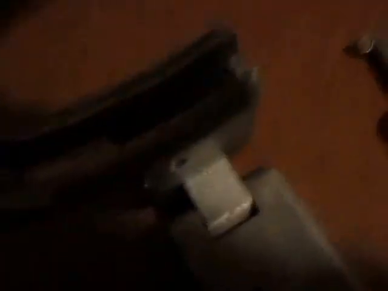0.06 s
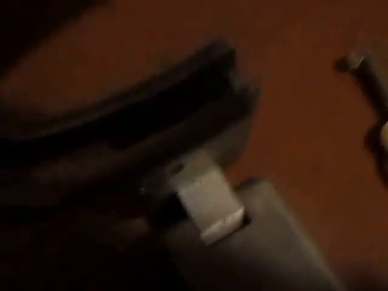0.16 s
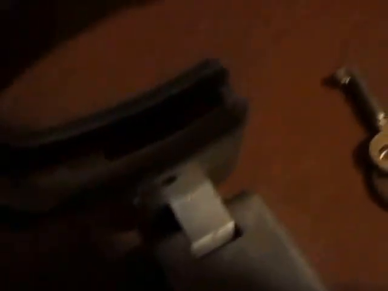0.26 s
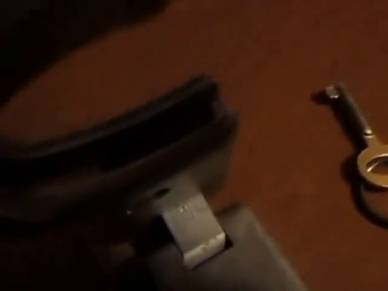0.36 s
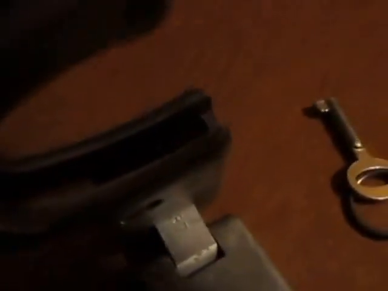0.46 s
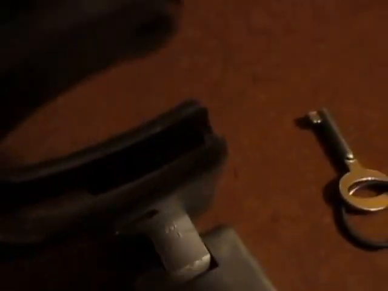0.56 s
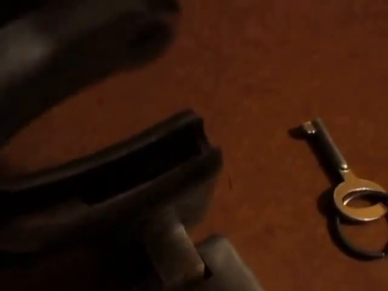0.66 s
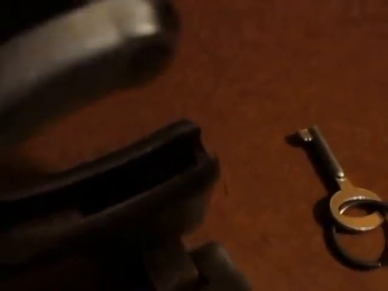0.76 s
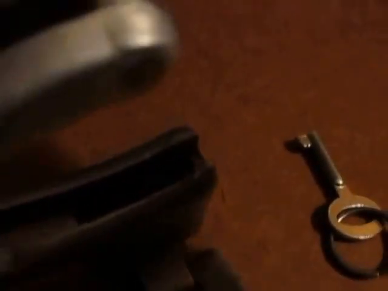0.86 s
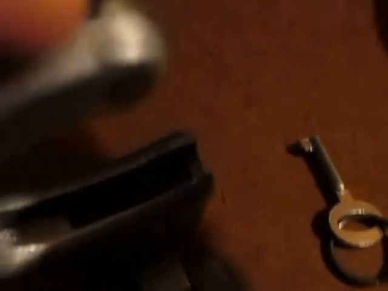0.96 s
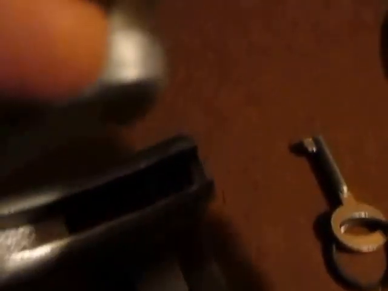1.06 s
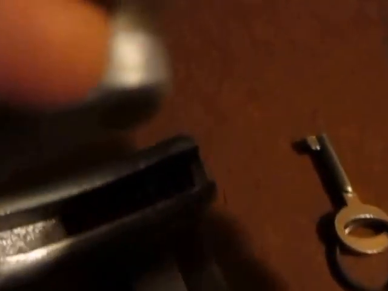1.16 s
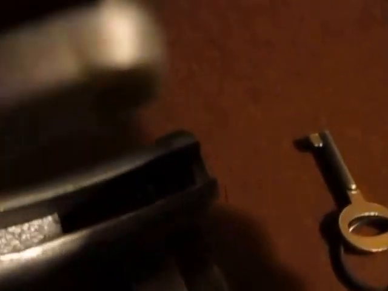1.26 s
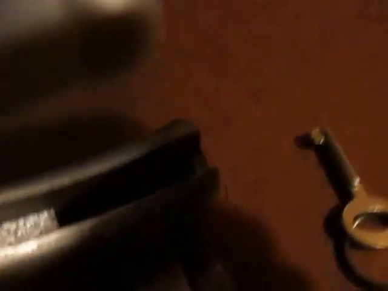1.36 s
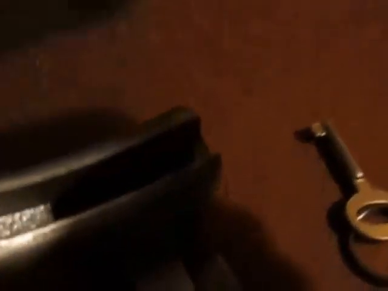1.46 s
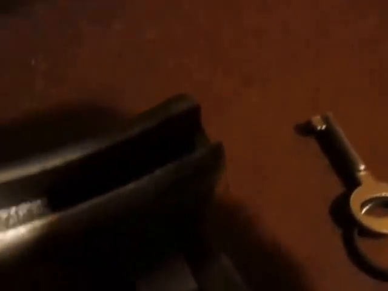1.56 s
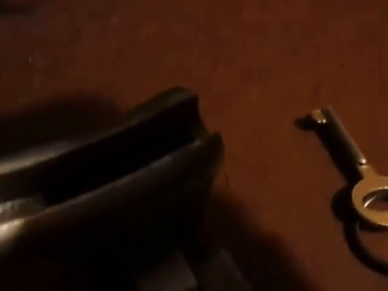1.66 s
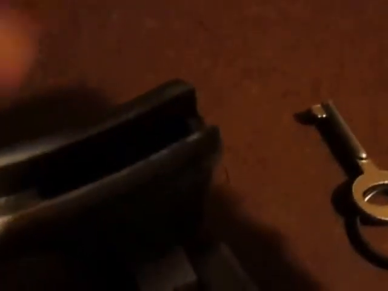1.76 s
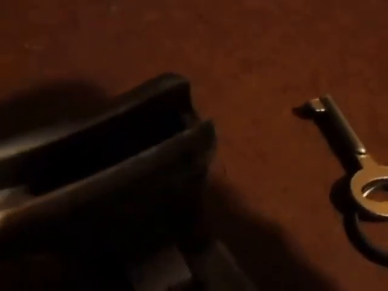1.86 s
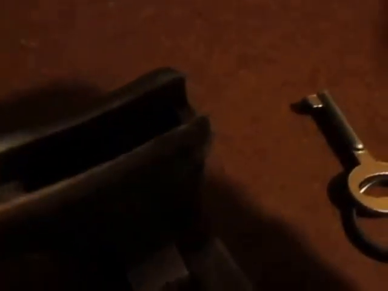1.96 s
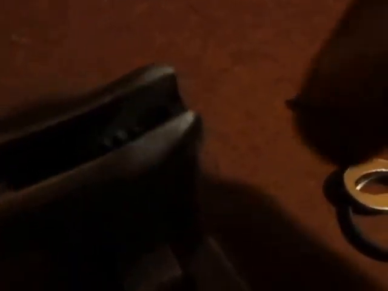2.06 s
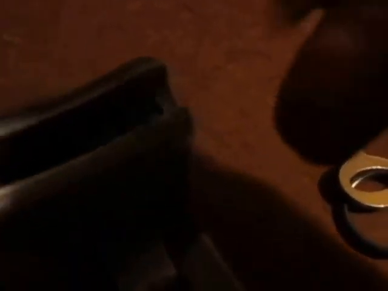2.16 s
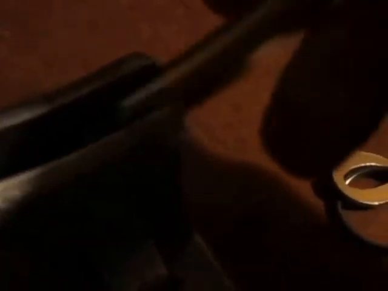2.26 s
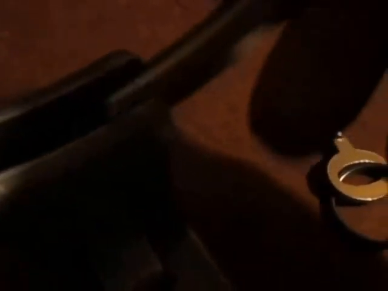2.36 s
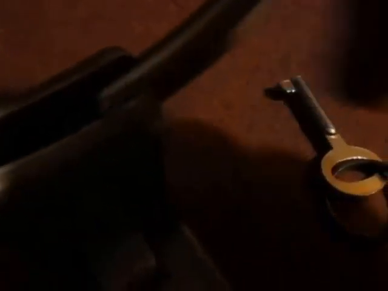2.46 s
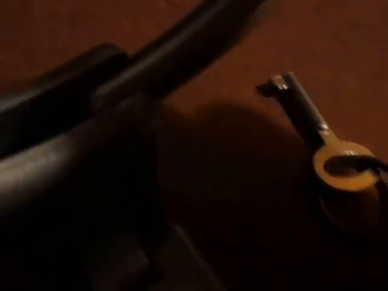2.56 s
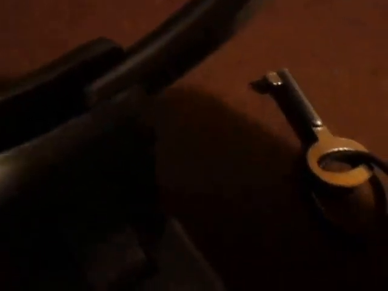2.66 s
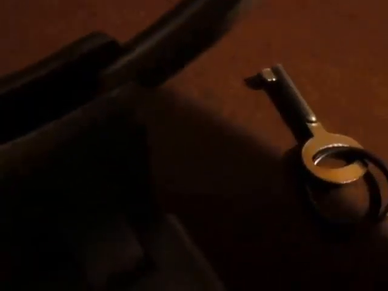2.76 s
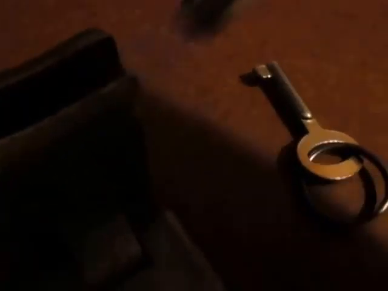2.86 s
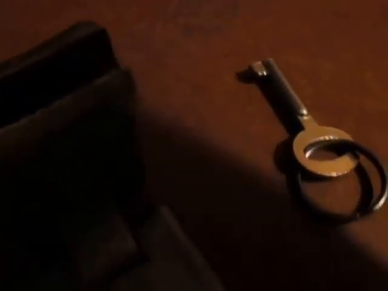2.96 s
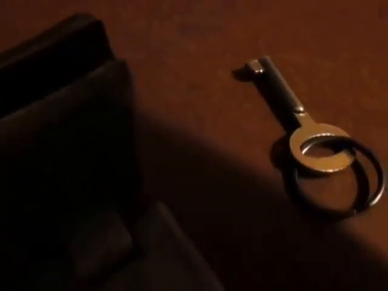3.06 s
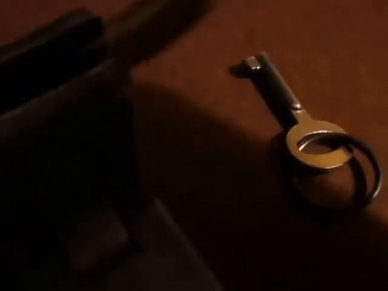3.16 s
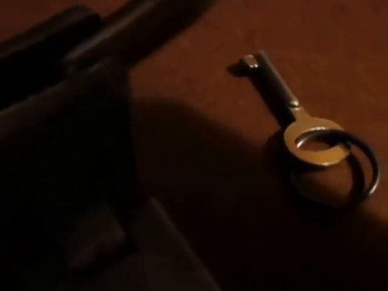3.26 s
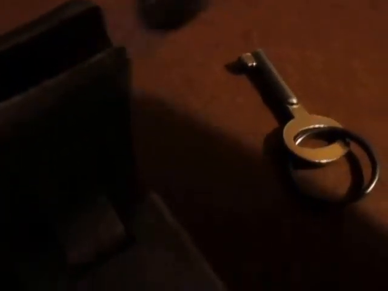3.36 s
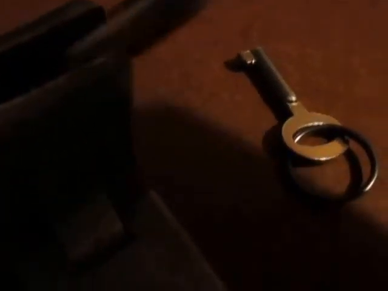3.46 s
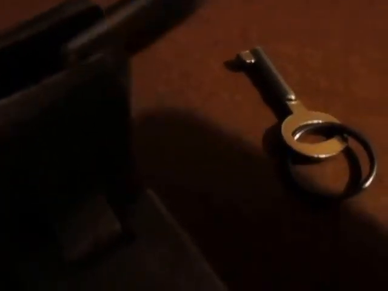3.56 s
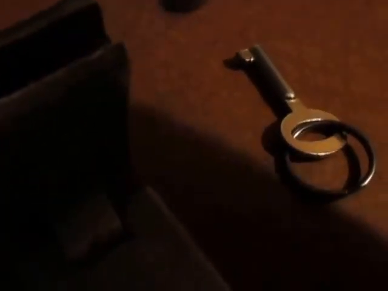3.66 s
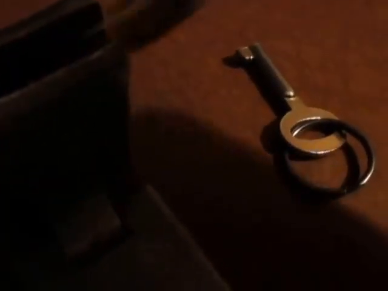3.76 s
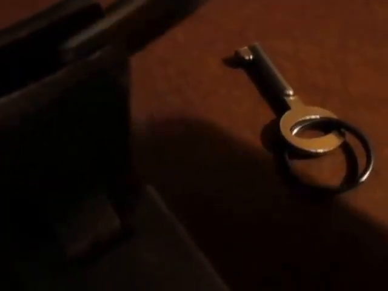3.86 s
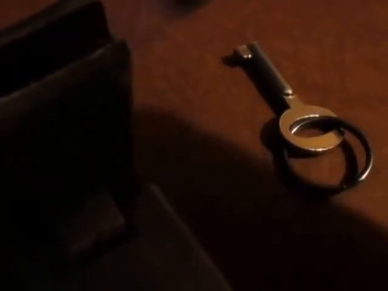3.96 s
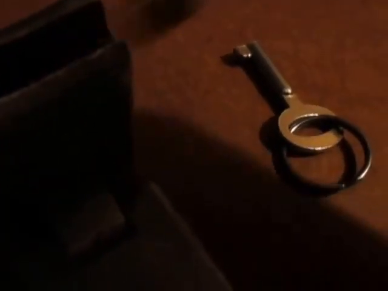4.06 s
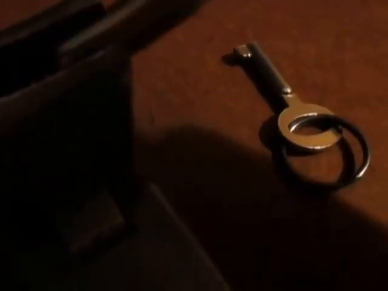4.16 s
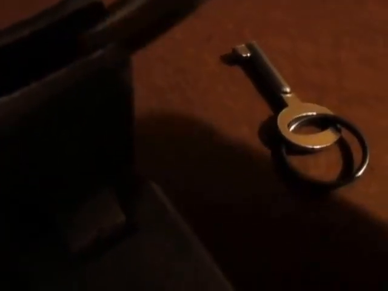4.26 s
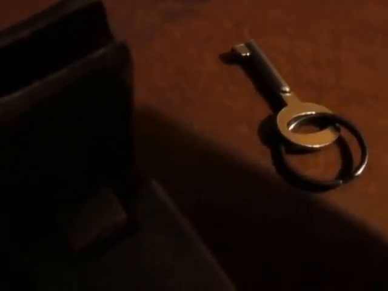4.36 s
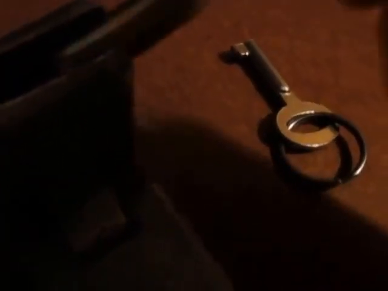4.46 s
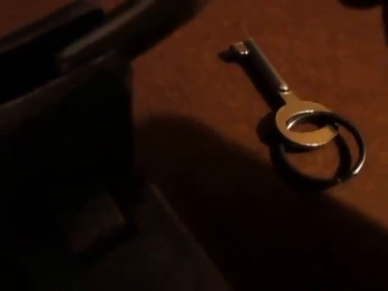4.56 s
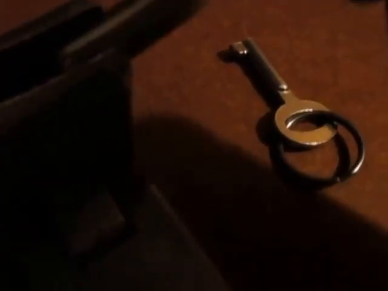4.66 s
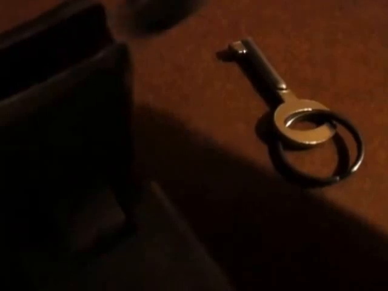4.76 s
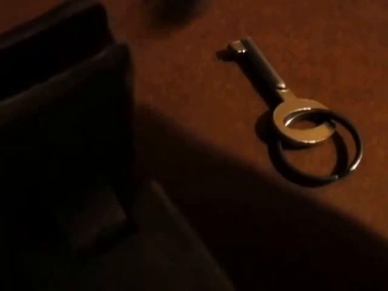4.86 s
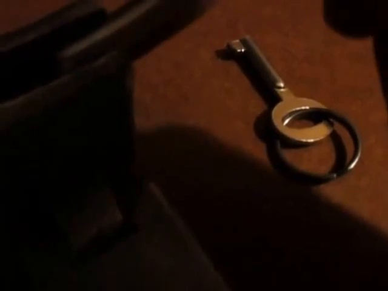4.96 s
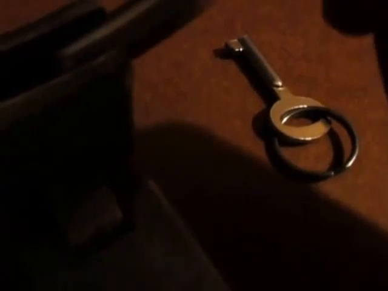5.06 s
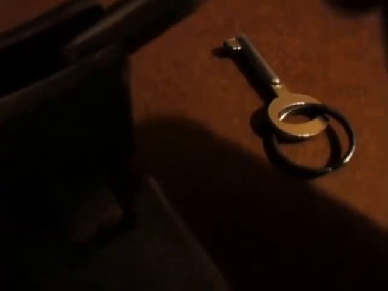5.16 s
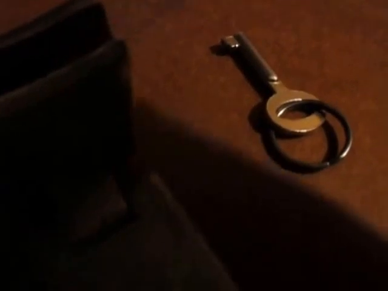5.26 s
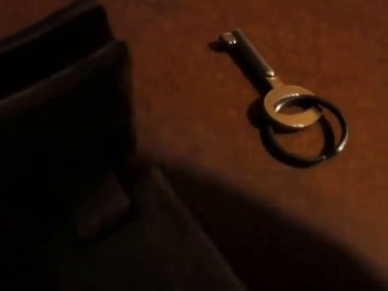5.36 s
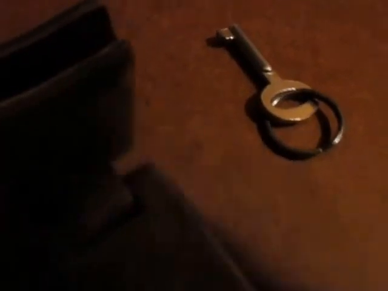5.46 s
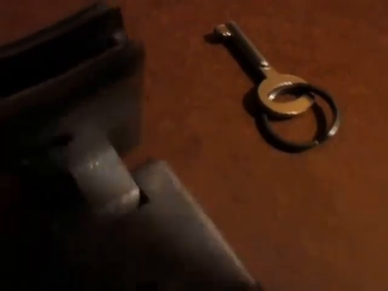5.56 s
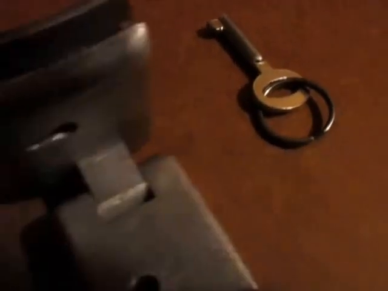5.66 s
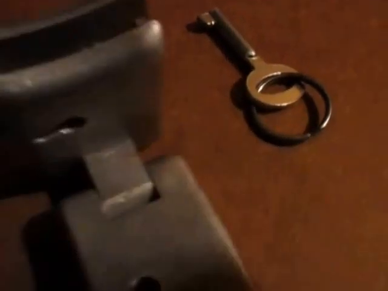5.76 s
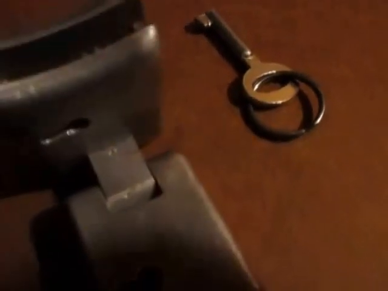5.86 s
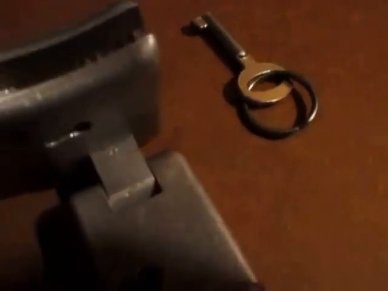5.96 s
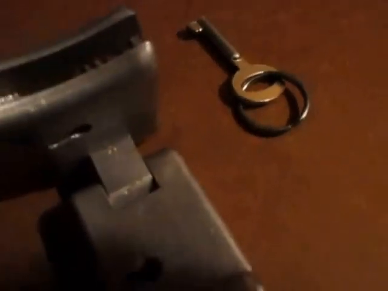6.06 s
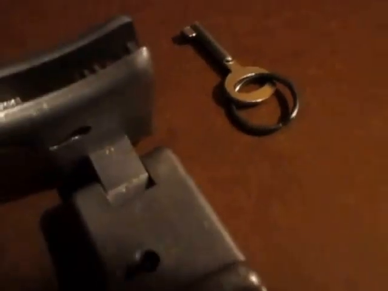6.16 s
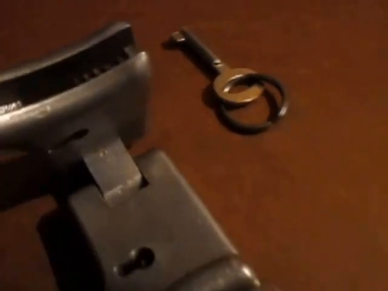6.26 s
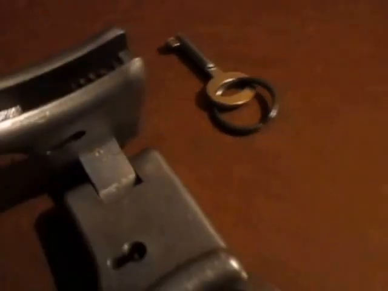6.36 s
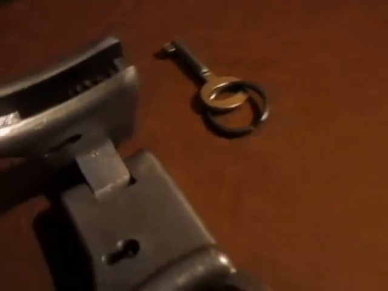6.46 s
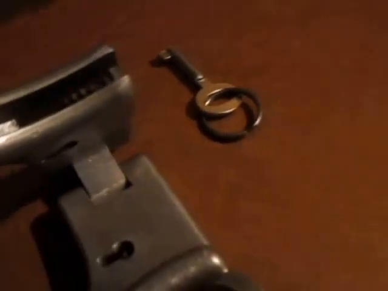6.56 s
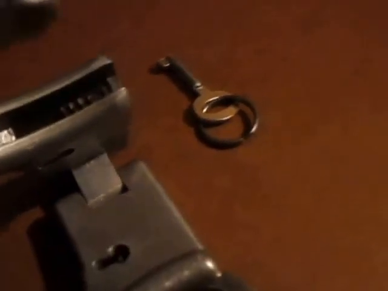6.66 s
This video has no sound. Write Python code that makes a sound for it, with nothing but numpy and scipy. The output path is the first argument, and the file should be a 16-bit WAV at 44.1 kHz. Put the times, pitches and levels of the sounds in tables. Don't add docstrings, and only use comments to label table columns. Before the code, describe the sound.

Steel handcuffs worked by hand on a wooden table, sharp ratchet snaps with quick rebounds, light rattles and knocks, over a low steady hum.

```python
import sys
import numpy as np
from scipy import signal
from scipy.fft import rfft, irfft, next_fast_len
from scipy.io import wavfile
from scipy.ndimage import uniform_filter1d, map_coordinates

SR = 44100
rng = np.random.default_rng(int(sys.argv[2]) if len(sys.argv) > 2 else 0)


def dump(signal):
    limited = np.clip(np.atleast_2d(signal).T, -1, 1)
    pcm = np.round(limited * 32767).astype(np.int16)
    wavfile.write(sys.argv[1], SR, pcm)


def makeup_ratio(level_db):
    decades = np.asarray(level_db, float) / 20
    return 10 ** decades


N = 295470

# (multiple of shaft rate, level [dB])
HUM_ORDERS = [(1, -11), (2, 1.5), (2.5, -11.5), (3, -16), (4, -20), (6, -25)]
# (frequency [Hz], level over the hiss [dB])
WHINE_TONES = [(3941, -10), (11795, -9.5)]
# (frequency [Hz], density [dB per Hz])
RUMBLE_SPECTRUM = [(20, -24), (34, -5.5), (54, -3.5), (105, -11), (178, -14.5), (300, -32), (390, -60),
                   (660, -120)]
# (frequency [Hz], density [dB per Hz])
HISS_SPECTRUM = [(150, -22), (312, 1), (390, -8), (1500, -14), (1780, -12), (2200, -16.5), (7100, -26.5),
                 (17000, -46)]
# (time [s], gain [dB])
CAMERA_GAIN = [(0, -2), (.7, 0), (2.24, 0.5), (2.31, -5), (2.5, -8.5), (2.75, -3), (3.1, -1), (3.5, -6.5),
               (3.9, -8), (4.5, -12.5), (4.9, -11.5), (5.6, -8), (5.75, -4.5), (5.95, -8), (6.7, -6.5)]

# (frequency [Hz], level [dB], t60 [s])
THUD_MODES = [(98.5, -6.5, 0.079), (134, 2, 0.13)]
LOW_PLANK_MODES = [(228, -2.5, 0.08), (290.5, -3.5, 0.11), (371, 4, 0.065)]
HIGH_PLANK_MODES = [(430, -4, 0.08), (607.6, 9, 0.038), (695, 3.5, 0.039), (801, -16.5, 0.12),
                    (1080, -13.5, 0.1)]
# (time [s], level [dB], thud
# [dB], low over high plank [dB])
TABLE_TAPS = [(.021, -46.5, 11, 15), (0.164, -48.5, 2, 23.5), (1.378, -50, 10, -6),
              (1.508, -34.5, -1.5, 5), (1.911, -49.5, 17, 7), (1.938, -42, -12, 2),
              (2.01, -48.5, 22.5, 4), (2.151, -38, -1, -7.5), (2.217, -42, 2.5, -0.5),
              (2.436, -32.5, -6, 4), (2.774, -44, 6, 3), (2.956, -48.5, -8, 13.5),
              (2.982, -50.5, -0.5, 12.5), (3.077, -47, 2, 11), (3.372, -34.5, -8, 2.5),
              (3.682, -41.5, -14, -6.5), (3.744, -47, 2, 12), (4.066, -37, 8.5, 5),
              (4.205, -52.5, -29, -19.5), (4.497, -18.5, 13, -1), (4.679, -51.5, 14.5, -2.5),
              (4.898, -25.5, -5.5, 8), (4.944, -19.5, -30.5, 1.5),
              (5.228, -41.5, -10.5, 11), (5.334, -43.5, 11, 4), (5.514, -53.5, -9, 16.5),
                 (5.55, -50, -4, -4), (5.822, -43, -7, 17), (6.03, -50.5, 1, 18.5), (6.099, -43.5, -5, 8.5),
                 (6.146, -52, 9, 9), (6.18, -38, -14, 7), (6.237, -40.5, 1, 13), (6.269, -40, 9, 10),
                 (6.593, -45, -11, 10.5), (6.613, -37.5, -31, 8.5)]

# (frequency [Hz], level [dB], t60 [s])
STEEL_MODES = [(3933, -6.5, 0.011), (4394, 4, 0.0056), (4869, -6, 0.013), (5370, -4.5, 0.01),
               (5910, 3, 0.0079), (6526, -2, 0.0077), (6930, -10, 0.0088), (7790, -7.5, 0.0087)]
SHEEN_MODES = [(8390, 11.5, 0.003), (9360, 0, 0.0067), (10440, 0, 0.0068), (11670, -2, 0.016),
               (12640, -13.5, 0.0047), (14160, -11, 0.0097), (16000, -13, .006)]
BODY_MODES = [(1152, -3.5, 0.015), (1278, -4, 0.019), (1553, -6.5, 0.013), (1864, -2.5, 0.012),
              (2177, 5.5, 0.005), (2585, -1, 0.0061), (3249, -0.5, 0.0087)]
# (time [s], steel [dB], body [dB], knock [dB], low over high plank [dB])
BOW_SLIPS = [(0.0737, -59.5, 15.5, -34, 9.5), (.108, -21.5, 3.5, -31.5, -5), (2.065, -39, -13, -32.5, -9.5),
             (2.256, -18, -8, -21, -1), (2.4994, -39.5, -5, -31, 5.5), (2.707, -28.5, -8, -32.5, -5.5),
             (2.842, -37.5, -2.5, -28.5, 9.5), (3.04, -26, -11.5, -24, 0),
             (3.1535, -13.5, -24, -25.5, 11.5), (3.452, -40, -7.5, -35.5, 8), (3.5792, -48, -7, -41, -3.5),
             (3.8687, -22, -13.5, -35.5, -2.5), (3.94, -37.5, -11, -37.5, 4.5),
             (4.227, -23.5, -15.5, -34.5, -0.5), (4.34, -48.5, 0.5, -33.5, 8),
             (4.7046, -20, -21, -35.5, -3), (4.752, -25.5, -12, -36, 4), (5.156, -26.5, -17.5, -40.5, -3.5),
             (5.4983, -48.5, -22.5, -55, 12.5), (5.611, -23, -14, -33.5, 1),
             (5.7093, -56.5, 21, -25.5, 7.5), (5.935, -46, -10.5, -42.5, 30), (6.3, -30, -25, -36.5, 9),
             (6.32, -44, -14, -37, 5.5)]
# (time [s], level [dB], sheen [dB], body [dB], rattle t60 [s])
STEEL_CHATTER = [(0.1149, -16.5, -19, -4, .012), (2.2702, -0.5, -25.5, -17, .023),
                 (3.138, -15.5, -29, -17.5, .04), (3.1458, -23.5, -22, -24, 0.011),
                 (3.1983, -15.5, -21, -16, .008), (3.236, -25.5, -44.5, -7.5, 0.17),
                 (3.3617, -35, -52, -8, .06), (3.4845, -10, -20, -33.5, .005),
                 (3.525, -30.5, -41, -17, .05), (3.9697, -37, -49.5, -9, .015),
                 (4.042, -52.5, -31.5, -33, .012), (4.9475, -21.5, -44.5, -5, .04),
                 (5.27, -56, -24, 5.5, .017), (6.255, -53, -51, 4, .05), (6.2854, -36, -58, -8.5, 0.093)]
# (time [s], snap [dB], flight [s], table knock [dB], rebound thud [dB])
PAWL_SNAPS = [
    (2.2671, 2, 0.019, -19.5, 8),
    (3.1948, -2, .0205, -21, 11),
    (3.479, -9, 0.023, -23, 2.5),
    (3.7974, -2, .018, -20, 15.5),
    (4.1086, -2, .0145, -19, 11),
    (4.469, -2.5, .0141, -18.5, 7),
    (4.9177, -3.5, 0.013, -19, 6.5),
]
# (frequency [Hz], t60 [s])
ROOM_DECAY = [(200, 0.092), (2000, 0.19), (6000, 0.095), (14000, 0.066)]
# (time [s], length [s], frequency [Hz], level [dB])
HINGE_SQUEAKS = [
    (2.865, .11, 1770, -54.5),
    (3.27, 0.078, 1790, -55),
    (4.292, 0.055, 4200, -60),
]
# (frequency [Hz], level re midrange [dB])
LINE_FLOOR = [(150, -37), (500, -16.5), (1200, -8), (2500, -6.5), (5000, -3), (10000, 4.5), (16000, 0.5)]

FRAME, FRAME_START = 1024, 440
LEAD_S = 0.01


def unit(x):
    return x / np.sqrt(np.mean(x ** 2) + 1e-20)


def along(points, hz):
    f, v = np.transpose(points)
    return np.interp(np.log(hz + 1), np.log(f + 1), v)


def wobble(rate_hz):
    knots = rng.standard_normal(int(N * rate_hz / SR) + 4)
    return map_coordinates(knots, [np.arange(N) * rate_hz / SR])


def noise(spectrum):
    size = next_fast_len(N + 8192)
    gain = makeup_ratio(along(spectrum, np.fft.rfftfreq(size, 1 / SR)))
    return irfft(rfft(rng.standard_normal(size)) * gain, size)[:N]


def ring(modes, chance, size, detune=0.012, spread_db=2.5):
    t = np.arange(size) / SR
    hz, db, t60_s = np.transpose(modes)[:, :, None]
    strength, pitch = chance[:len(modes), None], chance[-len(modes):, None]
    envelope = makeup_ratio(db + spread_db * strength - 60 * t / t60_s) * (1 - np.exp(-t * hz * 4.1))
    return np.sum(envelope * np.sin(2 * np.pi * hz * (1 + detune * pitch) * t), axis=0)


def rattle(jolt, t60_s, swell_s):
    t = np.arange(len(jolt)) / SR - LEAD_S
    swell = 0.5 * np.exp(np.minimum(t, 0) / swell_s)
    x = jolt * np.where(t < 0, swell, makeup_ratio(-60 * t / t60_s))
    x[np.argmax(t >= 0)] = 4.5
    return x / np.linalg.norm(x)


def add(track, start_s, sound):
    part = track[round(start_s * SR):][:len(sound)]
    part += sound[:len(part)]


def motor(t, gain_db):
    turns = np.cumsum(51.86 * (1 + 0.004 * wobble(2.1))) / SR
    hum = np.zeros(N)
    for order, db in HUM_ORDERS:
        hum += makeup_ratio(db + 0.55 * wobble(31)) * np.sin(2 * np.pi * order * turns + order)
    cut_db = -10.5 * np.clip((t - 2.27) / 0.05, 0, 1)
    return makeup_ratio(-37.5 + gain_db + cut_db) * hum


def rumble(gain_db):
    waver_db = 1.6 * wobble(3.2) + 1.9 * wobble(30)
    return makeup_ratio(-46 + gain_db + waver_db) * unit(noise(RUMBLE_SPECTRUM))


def camera_noise(t, gain_db):
    hiss = noise(HISS_SPECTRUM)
    midrange = signal.butter(2, [1200, 3500], "band", fs=SR, output="sos")
    hiss = hiss / np.std(signal.sosfilt(midrange, hiss))
    whine = sum(makeup_ratio(db) * np.sin(2 * np.pi * hz * t) for hz, db in WHINE_TONES)
    return makeup_ratio(-61 + gain_db) * (makeup_ratio(0.96 * wobble(11)) * hiss + whine)


def background():
    t = np.arange(N) / SR
    gain_db = np.interp(t, *np.transpose(CAMERA_GAIN))
    return motor(t, gain_db) + rumble(gain_db) + camera_noise(t, gain_db)


def knocks():
    rub_s = 0.017
    rows = [(*tap, rub_s) for tap in TABLE_TAPS]
    for s, _, _, knock_db, tilt_db in BOW_SLIPS:
        rows.append((s, knock_db, 0.5, tilt_db, rub_s))
    for s, _, flight_s, knock_db, thud_db in PAWL_SNAPS:
        rows.append((s, knock_db, -4.5, -6.5, 0.015))
        rows.append((s + flight_s, -21.5, thud_db, 3.1, 0.01))
    return rows


def table():
    out = np.zeros(N)
    rows = knocks()
    push = np.hanning(24) / 12
    chance = rng.standard_normal((len(rows), 3, 10))
    jolts = rng.standard_normal((len(rows), SR // 25))
    size = SR // 6
    for (s, db, thud_db, tilt_db, rub_s), c, jolt in zip(rows, chance, jolts):
        wood = makeup_ratio(thud_db - 6) * ring(THUD_MODES, c[0], size, detune=0.008)
        wood += makeup_ratio(tilt_db / 2 - 3.5) * ring(LOW_PLANK_MODES, c[1], size)
        wood += makeup_ratio(-tilt_db / 2 - 2.5) * ring(HIGH_PLANK_MODES, c[2], size)
        drive = np.convolve(rattle(jolt, rub_s, swell_s=0.0024), push)
        drive *= np.linalg.norm(push) / np.linalg.norm(drive)
        add(out, s - LEAD_S, -makeup_ratio(db) * signal.fftconvolve(wood, drive))
    return out


FULL_SHEEN_DB = -15.5


def clicks():
    rows = []
    for s, db, body_db, _, _ in BOW_SLIPS:
        sheen_db = FULL_SHEEN_DB + 1.9 * min(db + 25.5, 0)
        rows.append((s, db, sheen_db, body_db, 0.034, 0.0011))
    for row in STEEL_CHATTER:
        rows.append((*row, 0.08 * row[-1]))
    for s, db, flight_s, _, _ in PAWL_SNAPS:
        rows.append((s, db, -13, -17, 0.002, 0.0016))
        rows.append((s + flight_s, -3, -11.5, -14.5, 0.0458, 0.0001))
    return rows


def cuffs():
    out = np.zeros(N)
    rows = clicks()
    chance = rng.standard_normal((len(rows), 3, 16))
    jolts = rng.standard_normal((len(rows), SR // 10))
    crack = signal.firwin(41, [2600, 9000], pass_zero=False, fs=SR)
    size = SR // 28
    for (s, db, sheen_db, body_db, t60_s, swell_s), c, jolt in zip(rows, chance, jolts):
        steel = ring(STEEL_MODES, c[0], size)
        steel += makeup_ratio(sheen_db + 7) * ring(SHEEN_MODES, c[1], size)
        steel += makeup_ratio(body_db + 8.5) * ring(BODY_MODES, c[2], size)
        steel[:len(crack)] += makeup_ratio(16 + 0.24 * min(sheen_db - FULL_SHEEN_DB, 0)) * crack
        add(out, s - LEAD_S, makeup_ratio(db - 7) * signal.fftconvolve(steel, rattle(jolt, t60_s, swell_s)))
    return out


def room(x):
    out, step = np.zeros(N), SR // 4
    for start in range(0, N, step):
        hz, t, z = signal.stft(rng.standard_normal(SR // 3), SR, nperseg=256)
        decay = makeup_ratio(-60 * t / along(ROOM_DECAY, hz)[:, None])
        tail = signal.istft(z * decay, SR, nperseg=256)[1]
        tail = tail / np.linalg.norm(tail)
        add(out, start / SR + 0.0089, signal.fftconvolve(x[start:start + step], tail))
    return out


def hinge():
    out = np.zeros(N)
    for s, length_s, hz, db in HINGE_SQUEAKS:
        u = np.arange(round(length_s * SR)) / (length_s * SR)
        tone = np.sin(2 * np.pi * hz * length_s * u + 1.2 * np.sin(19 * u))
        add(out, s, makeup_ratio(db) * np.sin(np.pi * u) * tone)
    return out


def scene():
    steady, wood, steel = background(), table(), cuffs()
    echo = room(makeup_ratio(-27.5) * steel + makeup_ratio(-16) * wood)
    return (steel + wood + echo + hinge() + steady)[None]


def thinned(x, size, margin_db, pooled):
    hz, t, z = signal.stft(x, SR, "cosine", size, size // 2)
    power = np.abs(z) ** 2
    midrange = power[(hz > 1000) & (hz < 4000)].mean(0)
    if pooled:
        frame = np.minimum(t * SR // FRAME, len(x) // FRAME - 1).astype(int)
        top = np.zeros(frame.max() + 2)
        np.maximum.at(top, frame, midrange)
        midrange = np.maximum(top[frame], makeup_ratio(-24.5) * top[frame + 1])
    bands = np.repeat(rng.standard_normal((128, len(t))), size // 256 + 1, axis=0)[:len(hz)]
    margin_db = margin_db + 4.5 * bands * np.clip(hz / 4000 - 0.3, 0, 1)[:, None]
    floor_db = along(LINE_FLOOR, hz)[:, None] + margin_db
    keep = power > midrange * makeup_ratio(2 * floor_db)
    if not pooled:
        stands_out = power > 1.3 * uniform_filter1d(power, size=60, axis=0)
        keep &= (hz[:, None] < 4300) | stands_out
    return signal.istft(z * keep, SR, "cosine", size, size // 2)[1][:len(x)]


def camera_thinning(x):
    x = np.pad(x, (FRAME - FRAME_START, 2 * FRAME))
    x = x[:len(x) // FRAME * FRAME]
    treble = np.diff(x, 2, prepend=[0, 0])
    energy = (treble ** 2).reshape(-1, FRAME // 8).sum(1)
    before = np.roll(uniform_filter1d(energy, size=8, origin=3), 1)
    attack = ((energy > 20 * before) | (energy > 0.3)).reshape(-1, 8).any(1)
    short = np.repeat(attack | np.roll(attack, -1), FRAME).astype(float)
    short = uniform_filter1d(short, size=128)
    calm = (1 - short) * x + short * np.clip(x, -0.02, 0.02)
    out = short * thinned(x, size=256, margin_db=-10.5, pooled=True)
    out += (1 - short) * thinned(calm, size=2048, margin_db=-0.3, pooled=False)
    return out[FRAME - FRAME_START:][:N]


def low_pass(x):
    return signal.sosfilt(signal.butter(12, 16820, fs=SR, output="sos"), x)


def record(dry):
    x = signal.sosfilt(signal.butter(2, 35, "high", fs=SR, output="sos"), dry)
    x = np.clip(x, -0.9, 0.9)
    x = signal.sosfilt(signal.butter(6, 16400, fs=SR, output="sos"), x)
    mix = camera_thinning(x[0])[None]
    return low_pass(mix)


dry = scene()
out = record(dry)
dump(out)
```